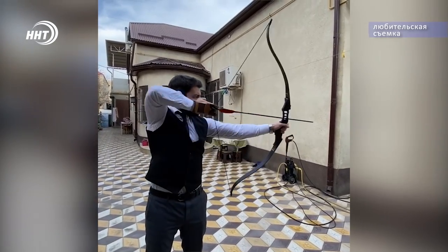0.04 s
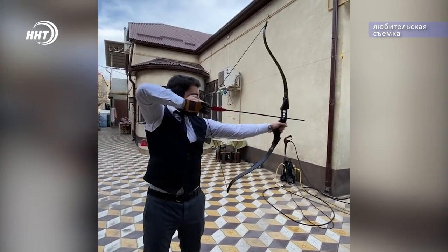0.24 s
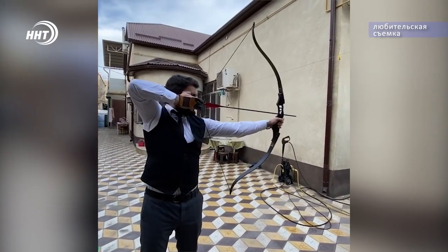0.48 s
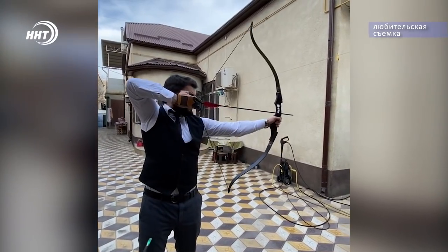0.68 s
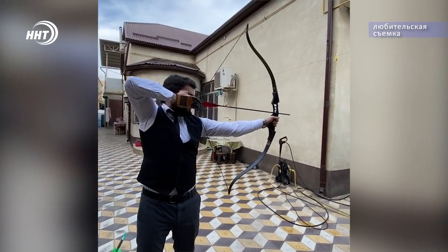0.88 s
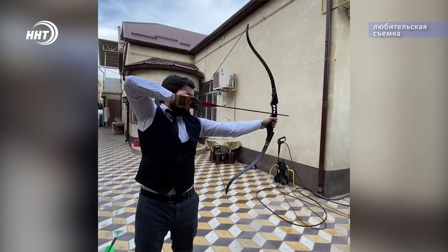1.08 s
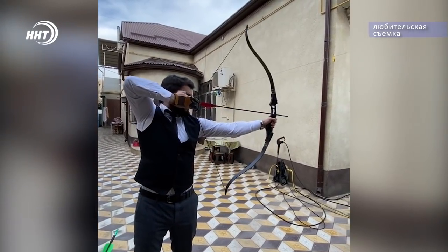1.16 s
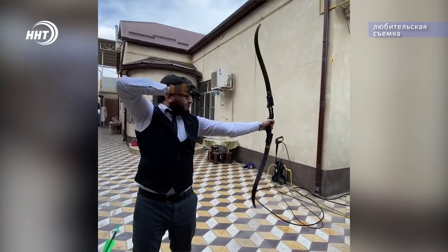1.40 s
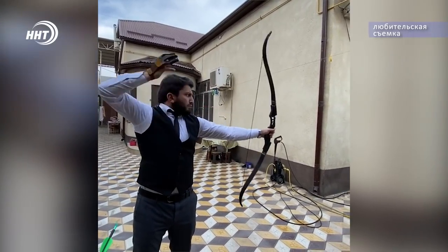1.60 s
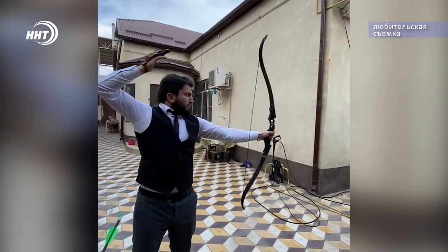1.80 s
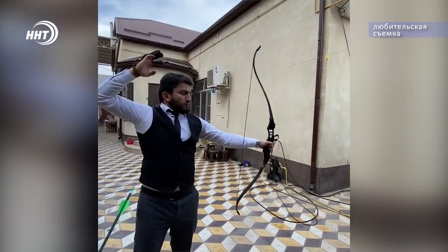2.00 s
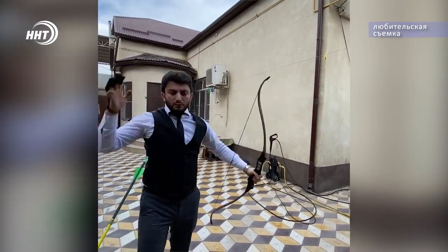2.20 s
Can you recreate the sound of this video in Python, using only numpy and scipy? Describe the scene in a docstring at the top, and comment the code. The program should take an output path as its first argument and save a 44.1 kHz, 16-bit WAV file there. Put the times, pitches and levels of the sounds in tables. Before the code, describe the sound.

A bow is shot in a quiet walled courtyard. Faint sleeve rustle, creaks and ticks fill the first 0.7 seconds. At about 1.2 seconds the string lets go with a quick zip and a loud, close snap. At about 1.4 seconds the arrow smacks into a nearby board. A low string hum and the wall echo fade toward 2 seconds, with a light tick and rustle.

```python
"""Bow shot in a courtyard

An archer draws a recurve bow in a paved, walled courtyard; arrow and sleeves rustle.
The string slips off the glove, whips the arrow past the rest and snaps taut, leaving a low hum.
The arrow smacks into a nearby target, the board rings and the walls throw the smack back."""
import sys
import numpy as np
from scipy import signal
from scipy.fft import rfft, irfft
from scipy.io import wavfile
from scipy.ndimage import uniform_filter1d

SR = 44100
rng = np.random.default_rng(int(sys.argv[2]) if len(sys.argv) > 2 else 0)


def dump(signal):
    """Clip the signal to [-1, 1] and save it as 16-bit WAV at the path in sys.argv[1]."""
    limited = np.clip(np.atleast_2d(signal).T, -1, 1)
    pcm = np.round(limited * 32767).astype(np.int16)
    wavfile.write(sys.argv[1], SR, pcm)


N = 99180
T = np.arange(N) / SR
HZ = np.fft.rfftfreq(N, 1 / SR)


def amp(db):
    """Decibels to gain."""
    return 10 ** (np.asarray(db) / 20)


def unit(x):
    """Scale to rms 1."""
    return x / np.sqrt(np.mean(x ** 2) + 1e-20)


def curve(points, hz):
    """Interpolate a table over log frequency."""
    freq_hz, value = np.transpose(points)
    return np.interp(np.log(hz + 1), np.log(freq_hz + 1), value)


def pan(left_db):
    """Channel gains, left over right by left_db."""
    return amp(np.array([[left_db], [-left_db]]) / 2)


def swell(centre_s, width_s):
    """Gaussian envelope."""
    return np.exp(-((T - centre_s) / width_s) ** 2)


def hit(start_s, rise_s, t60_s):
    """Linear rise, exponential decay."""
    age = np.maximum(T - start_s, 0)
    return np.minimum(age / rise_s, 1) * amp(-60 * age / t60_s)


def ring(modes, start_s, rise_s, lag_s):
    """Decaying modes; the right channel lags in phase."""
    age = T - start_s - np.array([[0], [lag_s]])
    return sum(amp(db) * hit(start_s, rise_s, t60_s) * np.sin(2 * np.pi * hz * age)
               for hz, db, t60_s in modes)


def thump(centre_s, hz, width_s):
    """Low zero-mean push and rebound."""
    window = swell(centre_s, width_s)
    swing = np.cos(2 * np.pi * hz * (T - centre_s))
    return window * (np.average(swing, weights=window) - swing)


def band(hz, width_hz):
    """Stereo noise in one resonance."""
    white = rfft(rng.standard_normal((2, N)))
    return unit(irfft(white / (1 + ((HZ - hz) / width_hz) ** 2), N))


# Left-right likeness of noise: freq_hz, correlation
STEREO_CORRELATION = [(60, .97), (200, 0.77), (500, 0.15), (1500, 0.51), (3500, -0.11), (12000, 0.24)]


def noise(spectrum, grain_db=0):
    """Shaped stereo noise at rms 1; gain jitter makes it grainy."""
    white = rng.standard_normal((2, N))
    jitter = np.repeat(rng.standard_normal(N // 32 + 1), 32)[:N]
    left, spare = rfft(white * amp(grain_db * jitter))
    correlation = np.clip(curve(STEREO_CORRELATION, HZ), -1, 1)
    right = correlation * left + np.sqrt(1 - correlation ** 2) * spare
    return unit(irfft(np.array([left, right]) * amp(curve(spectrum, HZ)), N))


# String slaps: start_s, level_db, thump_db
SNAPS = [(1.2056, 0.5, -14.5), (1.2186, -4.5, -37.5), (1.2365, -13.5, -17), (1.2722, -22, -18)]
# Slap spectrum: freq_hz, density_db
SNAP_SPECTRUM = [(60, -26.5), (250, -0.5), (400, -7.5), (900, -7.5), (1150, -11), (1600, -9), (2300, -7.5),
                 (4000, -11), (7000, -18), (12300, -22.5), (13500, -36)]
# Limbs, riser and fittings: pitch_hz, level_db, t60_s
BOW_MODES = [(83.6, -31, 0.55), (156.9, -26, 0.61), (264.1, -28, 0.68), (327, -37.5, .3), (490, -17, 0.2),
             (623, -23, .16), (751.4, -16, 0.2), (983, -24.5, 0.23), (1210, -33.5, 0.19),
             (1630, -25.5, 0.32), (2180, -15, 0.13), (3200, -23.5, .16), (3395, -29, 0.16),
             (5870, -31, 0.4)]


def string_snap():
    """The string snaps taut: crack, thump, ringing limbs, fading buzz."""
    snap_s, string_hz = SNAPS[0][0], STRING_MODES[0][0]
    crack = sum(amp(db) * hit(start_s, .001, .096) for start_s, db, _ in SNAPS)
    buzz = hit(snap_s, .02, .33) * (1 + .11 * np.cos(2 * np.pi * string_hz * (T - snap_s)))
    clatter = noise(SNAP_SPECTRUM, grain_db=1.5) * (amp(-16.5) * crack + amp(-24.5) * buzz)
    thumps = sum(amp(db) * thump(start_s + .0034, hz=225, width_s=.0045) for start_s, _, db in SNAPS)
    limbs = ring(BOW_MODES, snap_s, rise_s=.0022, lag_s=.00012)
    return clatter * pan(left_db=.5) + (thumps + limbs) * pan(left_db=-2.5)


# Braced string: pitch_hz, level_db, t60_s, rise_s
STRING_MODES = [(110.5, -27, .5, .07), (111.5, -40, 1.35, .42), (214.5, -28.7, .92, .37),
                (220.5, -30, 1.05, .05)]


def string_hum():
    """String and limbs keep swinging; close modes beat."""
    age = np.maximum(T - SNAPS[0][0], 0)
    tones = np.zeros(N)
    for hz, db, t60_s, rise_s in STRING_MODES:
        rise = np.minimum(age / rise_s, 1) ** 2
        decay = amp(db - 60 * np.maximum(age - rise_s, 0) / t60_s)
        tones += rise * decay * np.sin(2 * np.pi * hz * age)
    return amp(-2.5) * tones * pan(left_db=-2.5)


def release(start_s=1.170, end_s=1.2055, growth_db_per_s=540, zip_hz=3400, glide_hz_per_s=220000):
    """The string scrapes off the glove; the arrow passes the rest with a rising zip."""
    remaining_s = np.maximum(end_s - T, 0)
    gate = np.clip((T - start_s) / .0029, 0, 1) * amp(-60 * np.maximum(T - end_s, 0) / .02)
    scrape = noise([(150, -23), (500, -12.5), (850, 0), (1300, -6.5), (2200, -1), (3500, -4.5),
                    (6000, -4), (9000, -13), (12000, -15), (13500, -36)], grain_db=5)
    creep = amp(-51) * swell(start_s, .01)
    slip = amp(-26) * hit(start_s, .001, .028)
    rush = gate * amp(-22 - growth_db_per_s * remaining_s)
    pitch_hz = np.clip(zip_hz - glide_hz_per_s * (remaining_s - .004), .52 * zip_hz, zip_hz)
    cycles = np.cumsum(pitch_hz * (1 + .35 * rng.standard_normal((2, N))), axis=1) / SR
    zip_tone = amp(-10) * np.exp(-remaining_s / .006) * np.sin(2 * np.pi * cycles)
    return scrape * (creep + slip + rush) + gate * zip_tone


IMPACT_S, REBOUND_DELAY_S = 1.3578, .01253
# Arrow driving into the target: start_s, level_db
STRIKES = [(1.359, 3), (1.3655, -1), (1.3700, -3.5)]
# Smack spectrum: freq_hz, density_db
SMACK_SPECTRUM = [(100, -20), (420, -28.5), (560, 1.5), (900, 0.5), (1100, -14.5), (1400, -4.5), (2100, -1),
                  (2800, -10.5), (3500, -11.5), (5000, -20), (8000, -27.5), (12000, -33.5), (13500, -48)]
# Board and shaft: pitch_hz, level_db, t60_s
TARGET_MODES = [(543, -20, 0.065), (621, -19, 0.069), (833, -21.5, 0.052), (868.5, -9.5, 0.074),
                (1349, -18, 0.089), (1803, -19.5, .05), (2010, -12.5, 0.065), (2144, -16.5, .045),
                (3420, -14.5, 0.023)]


def target_impact():
    """The struck board rings, gives with a thud and rings again as the arrow stops."""
    crack = noise([(1000, -13.5), (2200, 6.5), (4500, -17), (7500, -4.5), (10000, -23.5), (15000, -25)])
    crack *= amp(-17) * hit(IMPACT_S, .00036, .017)
    smack = noise(SMACK_SPECTRUM)
    smack *= amp(-13) * sum(amp(db) * hit(start_s, .0015, .05) for start_s, db in STRIKES)
    board = ring(TARGET_MODES, IMPACT_S, rise_s=.00093, lag_s=.00012)
    rebound = amp(-2) * ring(TARGET_MODES, IMPACT_S + REBOUND_DELAY_S, rise_s=.0025, lag_s=.00009)
    thud = amp(-11.5) * thump(1.3685, hz=191, width_s=.0044)
    return (crack + smack) * pan(left_db=2) + board + rebound + thud * pan(left_db=-2)


# Board radiation: freq_hz, density_db
RADIATION_SPECTRUM = [(100, -6.5), (220, -5), (420, -14), (580, -5), (740, -11.5), (830, 5.5), (910, 3.5),
                      (1080, -11.5), (1350, -1), (1500, -4), (1750, 0), (2050, -2.5), (2700, -13),
                      (3500, -10), (5000, -21), (8000, -31), (12000, -41.5), (13500, -56)]


def board_radiation():
    """Dull burst sent from the struck board towards the walls."""
    pulse = irfft(amp(curve(RADIATION_SPECTRUM, HZ)), N)
    burst = np.roll(pulse / np.linalg.norm(pulse), round((IMPACT_S + REBOUND_DELAY_S / 2) * SR))
    return np.array([burst, burst])


# Wall echoes: delay_s, level_db
WALLS = [(0.068, -15.5), (0.162, -25), (.23, -11.5)]
# Courtyard decay: freq_hz, t60_s
YARD_DECAY = [(100, 1.1), (250, 1.405), (900, 0.95), (2000, .85), (4000, 0.82), (7000, 0.57), (13000, 0.31)]


def courtyard(source, build_s=.03, smear_s=.018):
    """Diffuse tail with smeared wall slaps; treble dies first."""
    slaps = 1 + 3 * sum(amp(db) * swell(delay_s, smear_s) for delay_s, db in WALLS)
    diffuse = noise([(60, -10), (200, -1.5), (400, 1), (900, .5), (2000, -1), (4000, -5), (12000, 5)])
    reflections = diffuse * slaps * np.minimum(T / build_s, 1)
    hz, age, frames = signal.stft(reflections, SR, nperseg=256)
    decay = amp(-60 * age / curve(YARD_DECAY, hz)[:, None])
    tail = signal.istft(frames * decay, SR, nperseg=256)[1]
    return signal.fftconvolve(source, tail / np.linalg.norm(tail[0]), axes=1)[:, :N]


# Rubbing envelope: time_s, level_db
RUB_ENVELOPE = [(0, -60), (.08, -56.5), (.2, -59), (.29, -64.5), (.32, -60.5), (.4, -70.5), (.47, -59.5),
                (.535, -49.5), (.57, -54.5), (.63, -58), (.66, -66.5), (.715, -58.5), (.76, -75),
                (.93, -72), (1.1, -91), (1.82, -72), (1.9, -60), (1.99, -57.5), (2.25, -70)]
# Rubbing spectrum: freq_hz, density_db
RUB_SPECTRUM = [(300, -15.5), (1500, 0), (2100, 0.5), (2900, -4), (3800, 0), (5200, -3), (7000, -6.5),
                (11000, -8), (12500, -12.5), (13500, -34.5)]


def rustle(patch_db=1.57):
    """Sleeves and the arrow on its rest rub in grainy patches."""
    frames = signal.stft(noise(RUB_SPECTRUM, grain_db=2.5), nperseg=256)[2]
    patches = uniform_filter1d(rng.standard_normal(frames.shape[1:]), size=3, axis=0)
    patches = unit(uniform_filter1d(patches, size=12, axis=1))
    rub = signal.istft(frames * amp(patch_db * patches), nperseg=256)[1][:, :N]
    return rub * amp(np.interp(T, *np.transpose(RUB_ENVELOPE)))


# Creaks and scuffs: centre_s, width_s, level_db, pitch_hz, width_hz
CREAKS = [(.01, 0.052, -47.5, 2150, 1620), (0.323, 0.023, -57.5, 800, 71), (0.314, 0.012, -60.5, 6200, 600),
          (0.499, 0.016, -58.5, 3800, 170), (0.542, 0.0087, -48, 2240, 200), (.63, .018, -57, 4900, 170),
          (0.706, 0.022, -60, 3570, 80), (1.978, 0.017, -53.5, 940, 130), (1.98, 0.026, -60, 1720, 400)]
# Ticks: start_s, level_db, pitch_hz
TICKS = [(.271, -62, 7000), (0.532, -44, 2380), (0.544, -40, 2380), (0.679, -59, 9000),
         (0.707, -52.5, 9200), (1.1575, -51, 9000), (1.183, -40, 8000), (1.190, -43, 6400),
         (1.8955, -40, 11750), (1.9024, -49.5, 11200)]


def gear():
    """Bow, arrow and gear creak and tick in the hands."""
    creaks = sum(amp(db) * swell(centre_s, width_s) * band(hz, width_hz)
                 for centre_s, width_s, db, hz, width_hz in CREAKS)
    ticks = sum(amp(db) * hit(start_s, .00043, .02) * band(hz, .11 * hz) for start_s, db, hz in TICKS)
    return creaks + ticks


# Outdoor air: freq_hz, density_db
AIR_SPECTRUM = [(25, -7.5), (75, -3), (150, -8.5), (230, -15.5), (300, -13.5), (480, -18), (1000, -19),
                (1700, -23), (2300, -31.5), (3400, -40.5), (4500, -28), (5500, -40.5), (8000, -49),
                (15000, -67)]


def air():
    """Outdoor background; a thin hiss comes up after the shot."""
    hiss = band(hz=4530, width_hz=340) * np.interp(T, [1.2, 1.85], [0, 1])
    return amp(-56.5) * noise(AIR_SPECTRUM) + amp(-65.5) * hiss


def scene(dip_db=-15):
    """Bow near, target farther off, both echoing; the level dips briefly near the end."""
    bow = release() + string_snap()
    target = target_impact()
    echo = courtyard(amp(-10.5) * bow + amp(-20.5) * target)
    echo += amp(12) * courtyard(board_radiation())
    mix = bow + target + string_hum() + echo + rustle() + gear() + air()
    return mix * amp(dip_db * swell(centre_s=2.208, width_s=.018))


def record(dry, ceiling=.84, cutoff_hz=15400):
    """Soft peak overload, then low-pass."""
    clipped = dry / (1 + (dry / ceiling) ** 6) ** (1 / 6)
    lowpass = signal.firwin(511, cutoff_hz, window=("kaiser", 9), fs=SR)
    return signal.oaconvolve(clipped, lowpass[None], "same")


dry = scene()
out = record(dry)
dump(out)
```